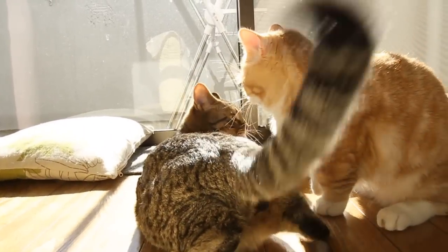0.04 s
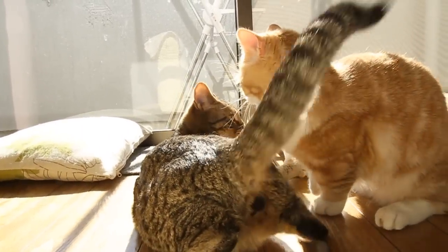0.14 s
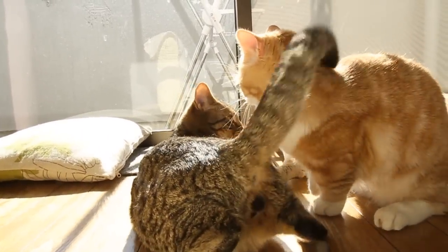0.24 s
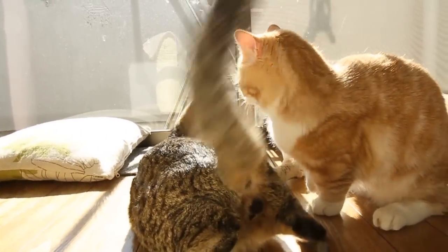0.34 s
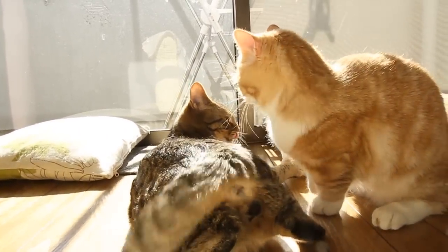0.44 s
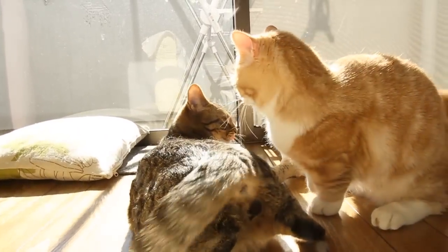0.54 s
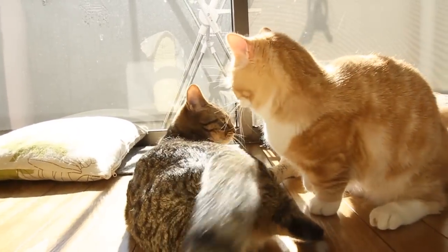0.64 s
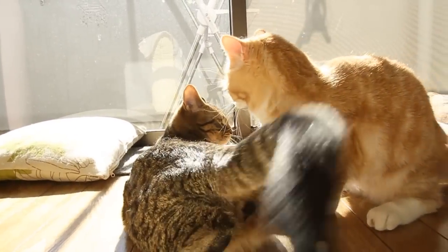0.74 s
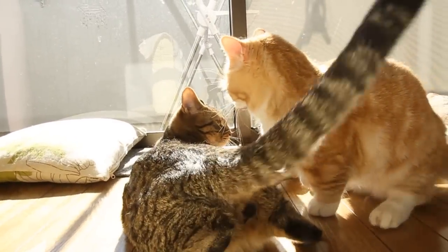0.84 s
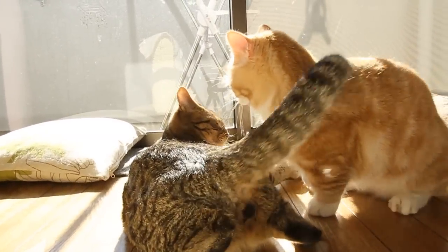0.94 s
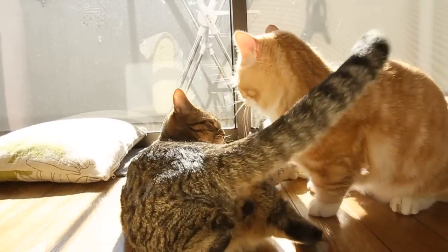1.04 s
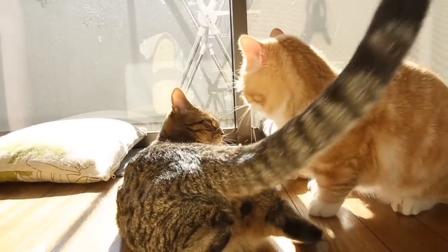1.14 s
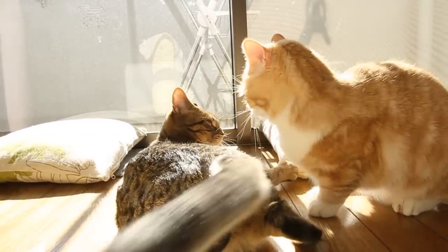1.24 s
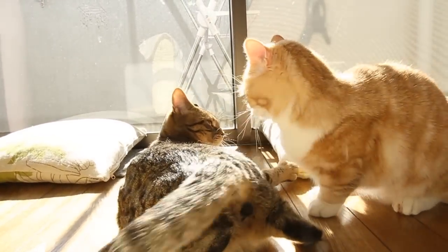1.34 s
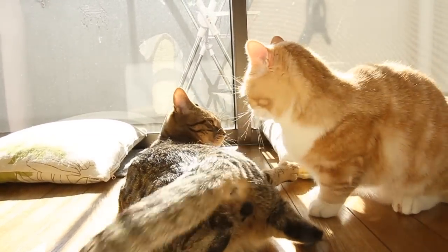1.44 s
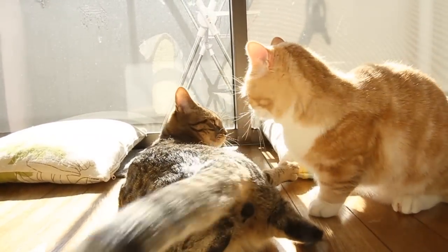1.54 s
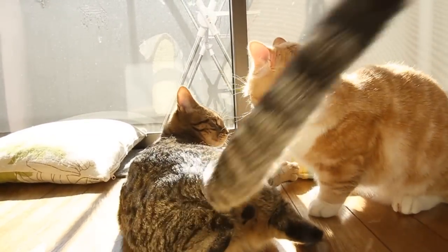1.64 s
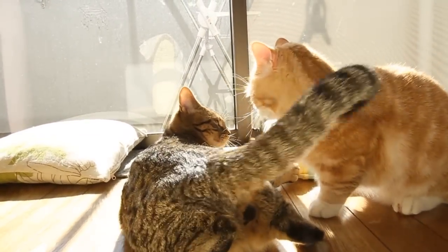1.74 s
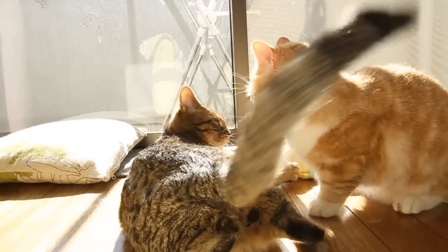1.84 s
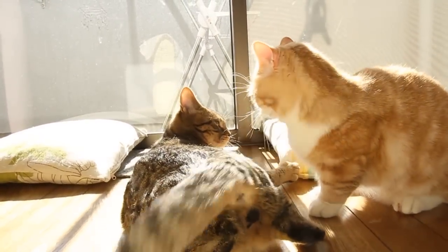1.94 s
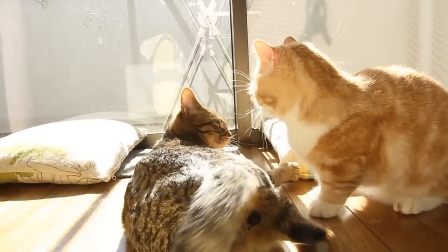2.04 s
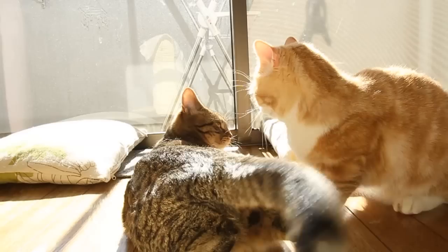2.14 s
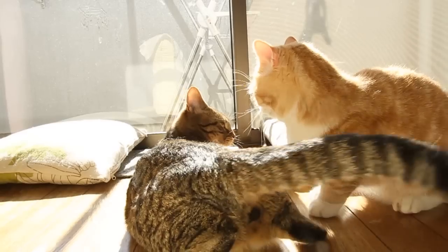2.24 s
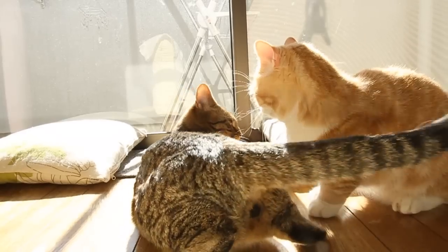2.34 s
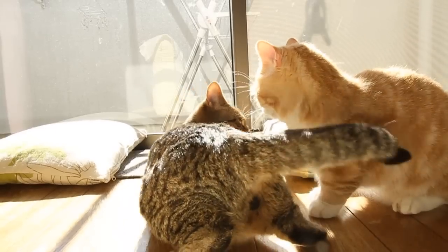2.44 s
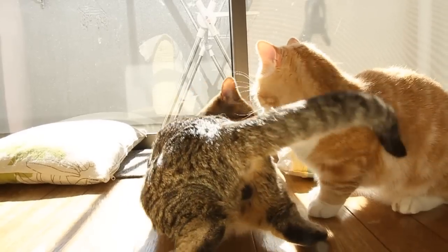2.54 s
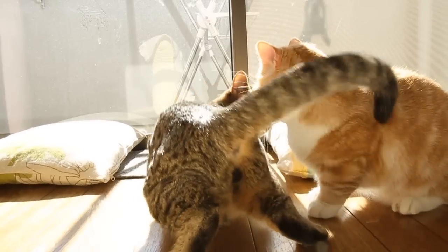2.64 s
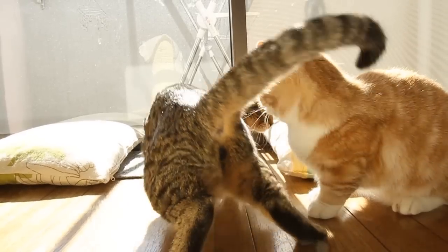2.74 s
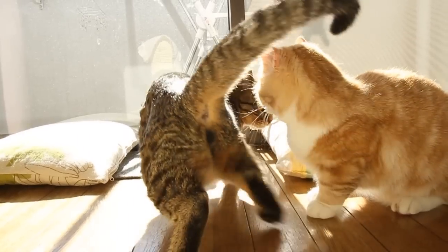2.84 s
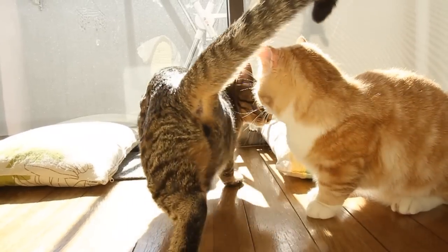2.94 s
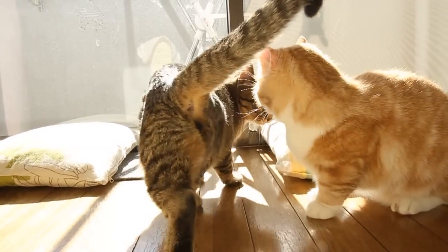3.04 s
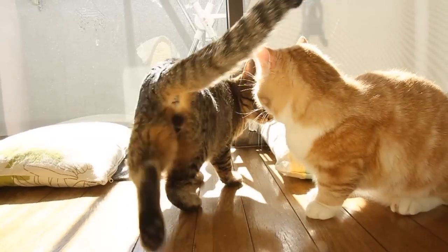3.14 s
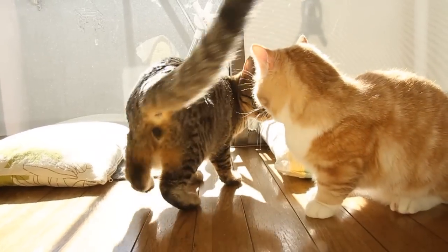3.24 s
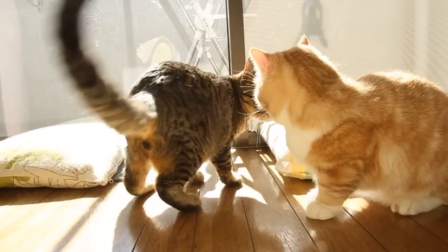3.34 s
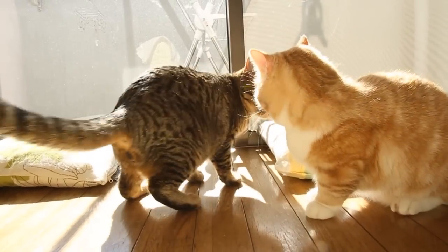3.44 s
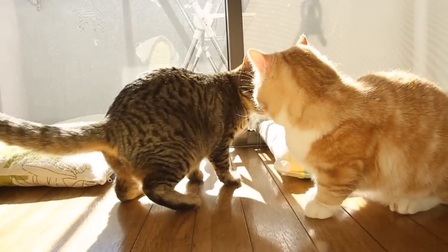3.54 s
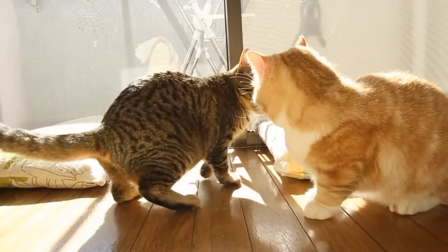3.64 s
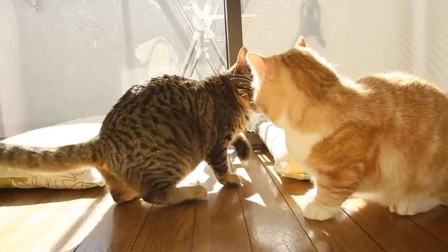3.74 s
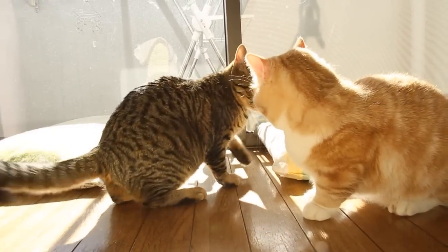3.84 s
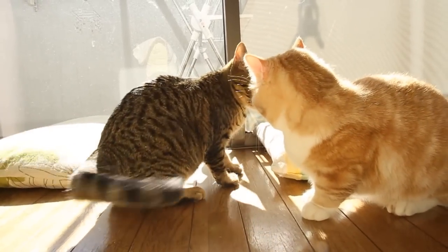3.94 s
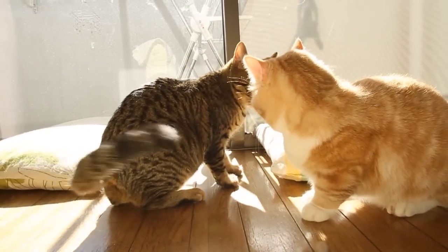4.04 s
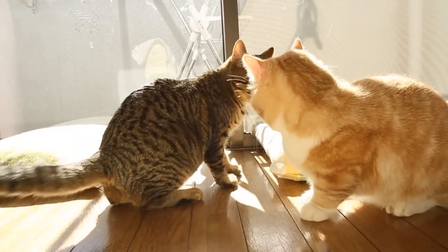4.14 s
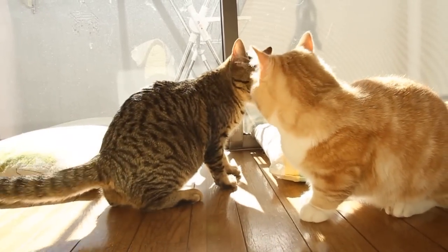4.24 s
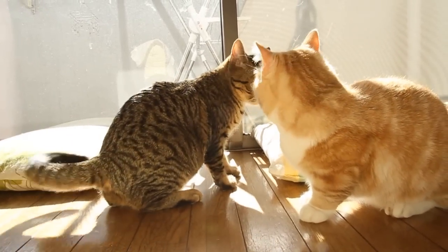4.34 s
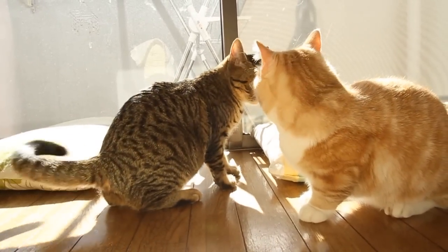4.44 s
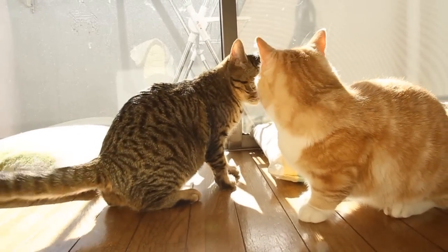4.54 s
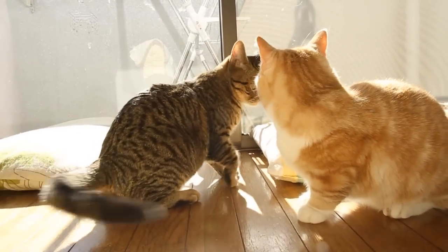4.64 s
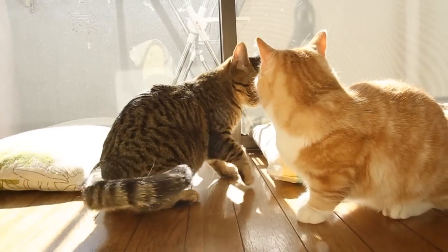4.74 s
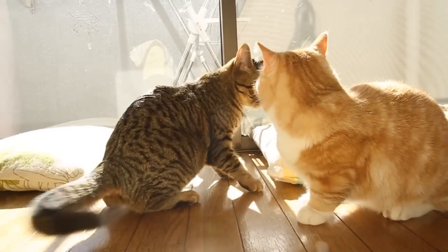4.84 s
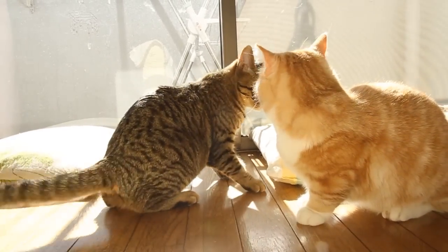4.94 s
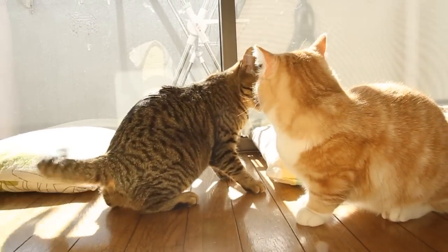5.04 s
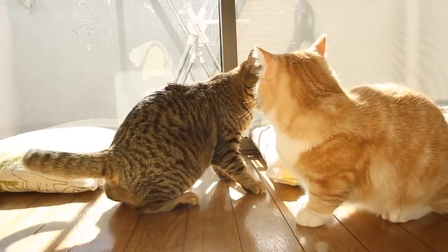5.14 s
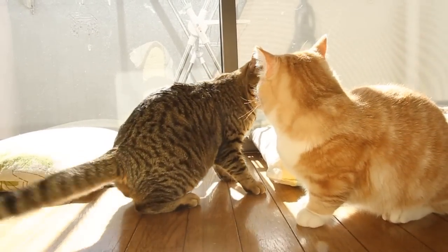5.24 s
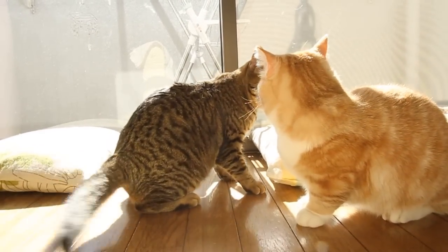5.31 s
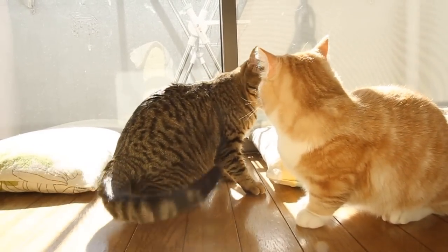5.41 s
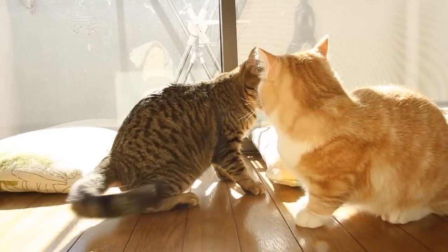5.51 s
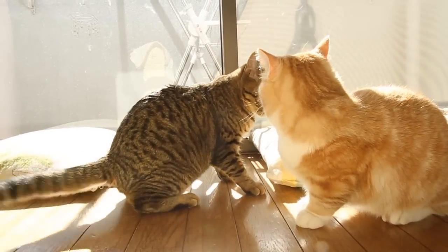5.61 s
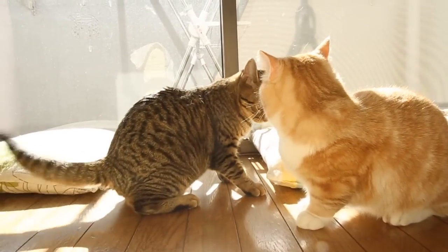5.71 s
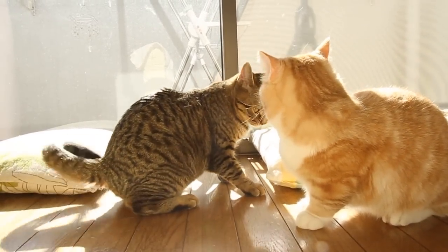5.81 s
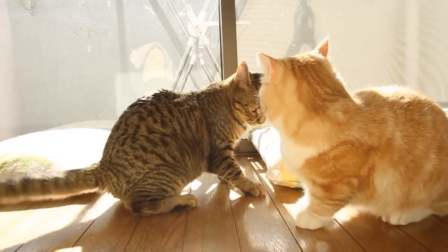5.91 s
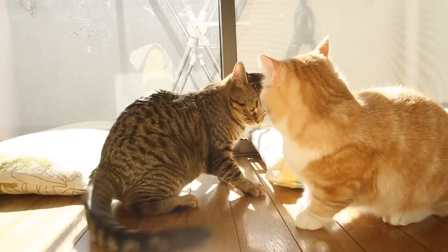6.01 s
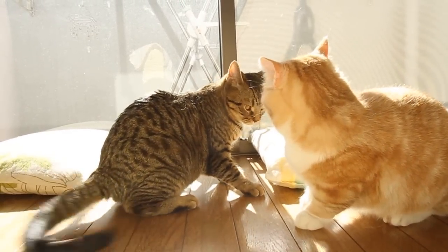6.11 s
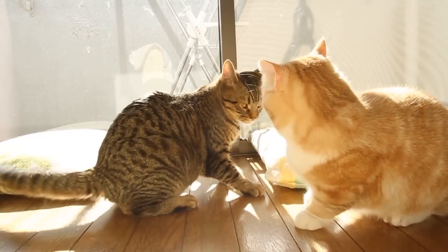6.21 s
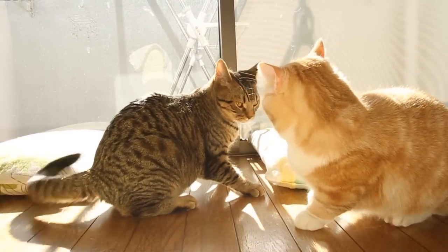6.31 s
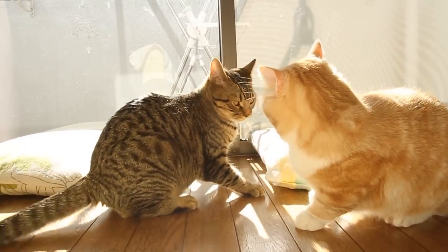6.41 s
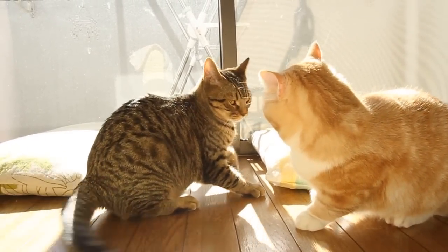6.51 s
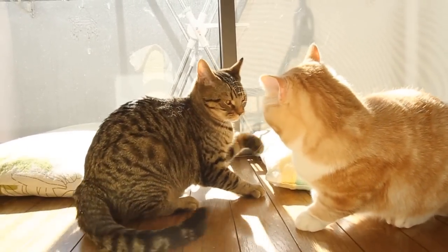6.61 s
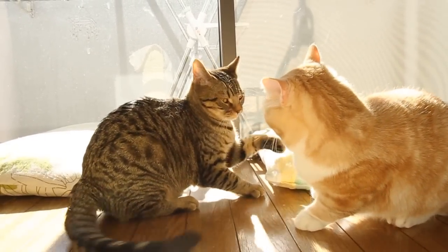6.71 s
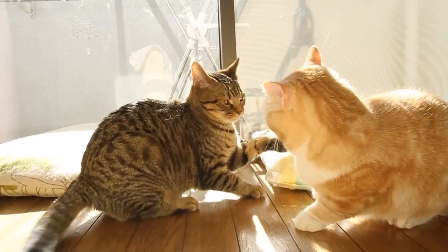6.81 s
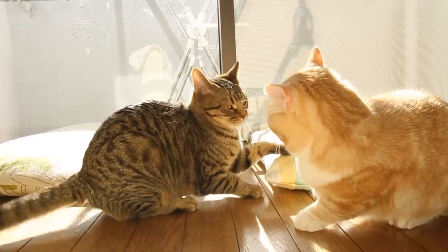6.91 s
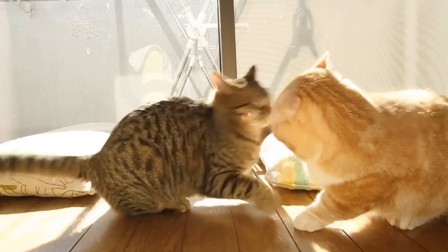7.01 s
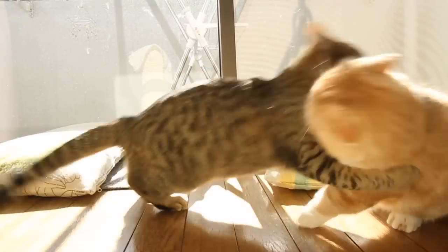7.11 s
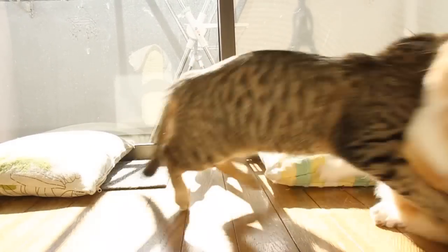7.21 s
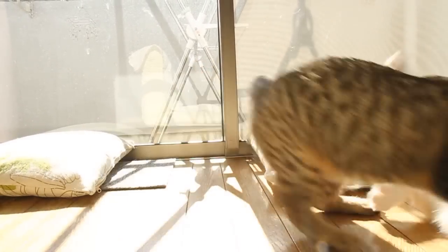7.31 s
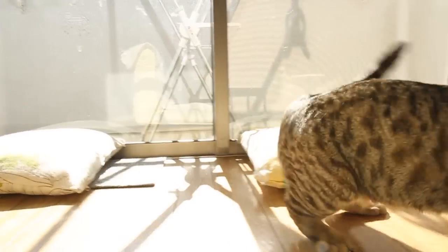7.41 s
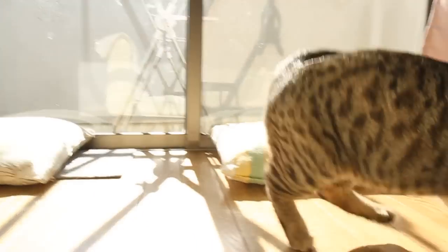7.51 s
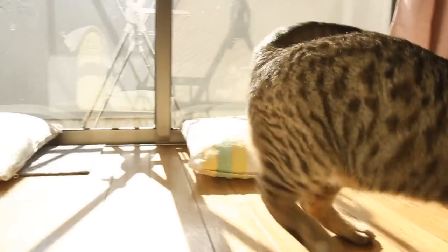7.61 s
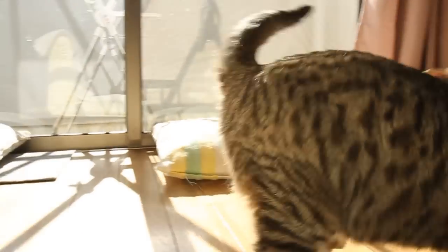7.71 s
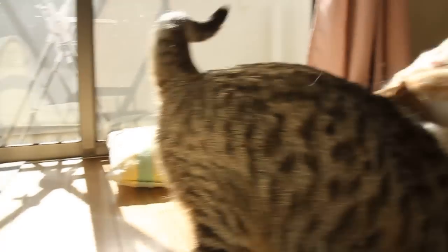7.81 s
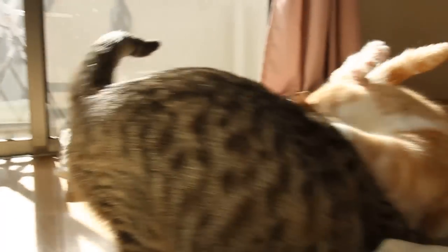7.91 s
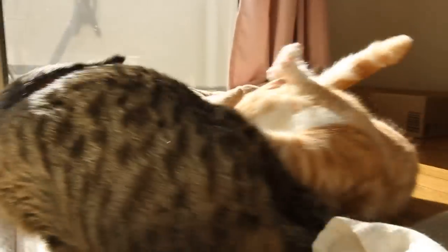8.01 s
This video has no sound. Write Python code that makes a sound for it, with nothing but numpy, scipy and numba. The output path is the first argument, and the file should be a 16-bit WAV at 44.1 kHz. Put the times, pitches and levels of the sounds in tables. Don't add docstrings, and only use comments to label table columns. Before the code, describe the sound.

Close indoor sound of two cats on floorboards: low hum and soft hiss, a firm tail knock, a few softer thumps, delicate claw clicks and a faint hard tinkle. Near the end a pounce breaks the calm with bright, gritty claw scrabbling, clustered woody thuds and two hoarse cat cries. The scuffle ends on a heavy thud, with short diffuse room echoes and background noise swelling as the microphone moves.

```python
import sys
import numpy as np
from scipy import signal
from scipy.fft import rfft, irfft
from scipy.io import wavfile
from scipy.ndimage import uniform_filter1d
from numba import njit

SR = 44100
rng = np.random.default_rng(int(sys.argv[2]) if len(sys.argv) > 2 else 0)


def pcm_store(signal):
    levels = np.round(np.clip(np.atleast_2d(signal), -1, 1) * 32767)
    wavfile.write(sys.argv[1], SR, levels.astype(np.int16).T)


def voltage_ratio(decibels):
    exponent = np.asarray(decibels, float) / 20
    return 10 ** exponent


N = 355446

MAINS_HZ = 59.925
# (multiple of mains [1], level [dB rms])
HUM_LINES = [(1, -68), (2, -53), (3, -62), (4, -62), (5, -63), (6, -72.5), (7, -56), (8, -60.5),
             (10, -69.5), (11, -68.5), (12, -64.5), (13, -60.5), (17, -70.5), (21, -79), (23, -75.5)]
# (frequency [Hz], density [dB per Hz])
HISS_SPECTRUM = [(25, -102), (60, -89), (120, -75), (200, -77.5), (400, -84.5), (700, -86.5), (1200, -87),
                 (2000, -92), (3000, -99), (5000, -101), (9000, -105), (11700, -104), (13000, -106),
                 (15000, -108), (16000, -112)]
RUMBLE_DB, SWELL_S = -68.5, 0.14
# (time [s], level [dB])
RUMBLE_SWELLS = [(.82, -56), (1.34, -55), (1.87, -50), (2.5, -52), (3.7, -58), (3.83, -48), (4.0, -57),
                 (6.47, -52), (6.701, -60), (7.14, -44), (7.32, -58), (7.76, -61), (8.0, -61)]
# (time [s], level [dB])
MIC_SWING = [
    (0, 0.5),
    (7.3, 1),
    (7.6, 5.5),
    (7.8, 4.5),
    (7.95, 4),
    (8.06, 4.5),
]

# (frequency [Hz], level [dB], t60 [s])
BOARD_MODES = [(118, -55, 0.36), (205, -3, 0.084), (270, -7.5, 0.18), (375, -2, 0.033), (432, -2.5, 0.032),
               (534, -59, 0.14)]
# (frequency [Hz], density [dB per Hz])
KNOCK_SPECTRUM = [(250, -43), (500, -3.5), (900, -3.5), (1500, 0), (2500, -7), (4000, -26), (16000, -52)]
# (time [s], peak level [dB], crack of the tip [dB])
TAIL_WHIPS = [
    (0.358, -12, -25),
    (1.885, -15, -27),
]
# (delay [ms], level [dB], board [Hz], contact [ms], t60 [s])
WHIP_PARTS = [
    (0, 1, 370, 0.97, 0.044),
    (2.9, -0.5, 166.6, 1.4, 0.066),
]
TIP_LAG_S, TIP_HZ, TIP_MS, TIP_T60_S = .0015, 1500, .28, .03
# (time [s], peak level [dB], board [Hz], contact [ms])
PAD_FALLS = [(.332, -25, 167, 1.1), (.583, -26.5, 159, 2.93), (0.5896, -25, 199, 1.21),
             (1.457, -36, 161, 4.2), (1.8508, -19, 169, 1.3), (2.043, -31, 172, 4.4),
             (2.0602, -30.5, 175, 1.4), (2.932, -35, 137, 1.8), (3.628, -39.5, 70.6, 6),
             (3.842, -30.5, 127, 1.7), (4.55, -36.5, 64, 7.1), (5.234, -18.5, 109.7, 5.3),
             (6.306, -22, 121, 2.75), (6.332, -27.5, 305, 1.13), (6.385, -33.5, 153, 2.3)]
# (time [s], peak level [dB], board [Hz], contact [ms], t60 [s])
BODY_FALLS = [(6.882, -31.5, 105.5, 4.4, 0.42), (7.057, -25, 109, 2.9, 0.061), (7.184, -28, 143, 2.8, 0.15),
              (7.209, -28, 269, 3.7, 0.18), (7.237, -13.5, 114.7, 3, 0.14), (7.253, -23, 270, 2.1, 0.069),
              (7.261, -8, 205, 1.56, 0.092), (7.327, -21, 222, 3.2, 0.055), (7.497, -21, 126, 2.9, 0.068),
              (7.515, -22, 118, 6, 0.07), (7.61, -14.5, 131, 3.3, 0.11), (7.69, -24.5, 282, 0.88, .08),
              (7.758, -11, 157, 2.53, 0.026), (7.766, -23, 271, 3.1, 0.14), (8.007, -5.5, 130, 3.53, 0.062),
              (8.026, -16, 205, 5.3, .17)]
# (time [s], peak level [dB], board [Hz], contact [ms])
PAW_LANDINGS = [
    (6.311, -24.5, 185, 0.83),
    (6.913, -28.5, 370, 0.54),
    (6.925, -18.5, 512, .17),
    (6.933, -23, 1460, .32),
    (6.951, -23, 181, 1),
    (6.996, -15, 368, 0.53),
    (7.012, -16.5, 442, 0.46),
    (7.039, -25, 384, 0.83),
    (7.149, -33, 120, 1),
]
WHIP_SECOND_HZ, CLAW_BOARD_HZ = 520, 960
PAD_SECOND_BOARD, FALL_SECOND_BOARD = 1.7, 1.8
PAD_CYCLES, CYCLES_PER_MS = 4.9, 2.1
POUNCE_T60_S = 0.054

# (time [s], peak level [dB], t60 [s])
FUR_BRUSHES = [(0.334, -35, 0.038), (0.36, -49, 0.17), (0.5867, -35.5, 0.076), (1.196, -44, 0.11),
               (1.46, -46, .089), (1.852, -35, 0.044), (1.886, -44, 0.089), (2.05, -44.5, 0.12),
               (3.644, -36, .018), (4.47, -39, .013), (6.31, -38, 0.081), (7.5162, -16.5, 0.036),
               (7.693, -31.5, 0.19)]
BRUSH_HZ, BRUSH_SHARE = 9500, 3
# (time [s], peak level [dB], centre [Hz])
CLAW_TAPS = [(.612, -48, 12000), (2.249, -43.5, 6200), (2.545, -46, 14200), (2.723, -41, 4100),
             (2.7525, -34, 4440), (2.759, -34, 4230), (2.918, -44, 2700), (3.0604, -30, 4700),
             (3.073, -35, 8000), (4.56, -47, 3400), (5.14, -46, 3700), (6.384, -41.5, 3080),
             (7.782, -40, 5000), (8.035, -43, 5460)]
TAP_SHARE, TAP_T60_S = 0.5, 0.032
# (time [s], peak level [dB], centre [Hz])
HARD_TINKLES = [
    (3.607, -55, 3550),
    (3.865, -46, 3000),
    (3.9, -57, 3070),
    (4.005, -51, 3070),
    (4.351, -49.5, 7160),
]
TINKLE_SHARE, TINKLE_T60_S = .1, 0.11
# (time [s], peak level [dB], centre [Hz], width as share of centre [1])
CLAW_SCRABBLES = [(6.885, -48, 4030, .34), (6.912, -23, 3430, 0.45), (6.9265, -8.5, 3630, 0.27),
                  (6.926, -29, 13000, .5), (6.937, -19, 6000, 0.81), (6.9971, -6.5, 5000, 0.58),
                  (7.001, -10, 3380, 0.29), (7.007, -20, 14000, .37), (7.0116, -1.5, 3580, 0.44),
                  (7.021, -12, 6500, 0.53), (7.1402, -21, 3520, 0.41), (7.1565, -29, 5070, 0.18),
                  (7.184, -25, 5000, 1.3), (7.199, -17.5, 4570, 0.21), (7.206, -15, 4230, 0.14),
                  (7.2178, -25, 12000, .5), (7.27, -10.5, 3430, 0.66), (7.281, -27, 12500, .6),
                  (7.5273, -23, 12000, .8)]
CLAW_T60_S = 0.029

# (frequency [Hz], density [dB per Hz])
FUR_SPECTRUM = [(150, -30), (300, 1.5), (900, -1), (1500, 0), (2500, 2.5), (4500, -3), (6500, -2),
                (7600, -13.5), (9500, -12.5), (12000, -10), (15000, -19)]
# (peak time [s], level [dB], rise [ms], fall [ms], brightness [dB])
STROKES = [(.85, -64, 250, 300, 11), (1.006, -46.5, 15, 53, -12), (1.2, -60, 100, 92, -5),
           (3.9, -53, 160, 70, -15), (5.14, -55, 10, 25, -3), (5.92, -74, 50, 300, 11),
           (6.33, -64, 150, 300, 0), (6.885, -42, 7.7, 69, -4), (6.94, -37, 28, 16, 7),
           (7.022, -45, 17, 86, 8), (7.15, -34.5, 7.2, 60, -1), (7.195, -31.5, 46, 30, 3.5),
           (7.29, -44, 56, 60, 1), (7.44, -39, 40, 150, -12), (7.562, -30.5, 30, 70, -9),
           (7.71, -53, 66, 31, -12), (7.95, -59, 400, 800, 2)]

# (time [s], pitch [Hz], level [dB], throat [Hz], mouth [Hz])
SQUALLS = [
    [(7.34, 328.8, -40, 1670, 1990), (7.351, 341.5, -20, 1660, 2040), (7.369, 370, -14, 1470, 2500),
     (7.39, 366.6, -11.5, 1430, 2610), (7.405, 373, -19.5, 1540, 2920), (7.42, 382, -28, 1400, 2400),
     (7.44, 376, -48, 1470, 2600)],
    [(7.49, 440, -31, 1830, 2300), (7.513, 386, -18.5, 1560, 2250), (7.539, 392, -19, 1560, 2300),
     (7.551, 432, -18, 1740, 2600), (7.575, 404, -21, 1630, 2750), (7.603, 372, -26, 1470, 2600),
     (7.64, 378, -35, 1920, 2500), (7.69, 378, -36, 1450, 2250), (7.715, 360, -40, 1050, 2070)],
]
CHEST_PUSH = [-7.5, -22]
THROAT_RING = [-.5, -2.5]
# (frequency [Hz], width [Hz], level [dB])
HEAD_RESONANCES = [(785, 160, -16), (1150, 200, -11), (3700, 600, -22), (6500, 1100, -21),
                   (11800, 1500, -30)]
# (frequency [Hz], width [Hz], level [dB])
RASP_BANDS = [(824, 1570, -12.5), (5000, 2000, -22.5), (8000, 1300, -23.5)]
ROUGH_START, ROUGH_END, PAIRS = .22, .95, .32

# (frequency [Hz], t60 [s])
ROOM_DECAY = [(80, 0.36), (300, 0.33), (1000, 0.22), (4000, 0.28), (12000, 0.25)]


def rms_one(x):
    return x / np.sqrt(np.mean(x ** 2) + 1e-20)


def in_time(rows, column):
    table = np.array(rows)
    return np.interp(np.arange(N) / SR, table[:, 0], table[:, column])


def gate(rows, fade_s=0.021):
    t = np.arange(N) / SR
    inside = np.minimum(t - rows[0][0], rows[-1][0] - t)
    return np.clip(inside / fade_s + 1, 0, 1)


def at_hz(points, hz):
    table = np.array(points)
    return np.interp(np.log(hz + 1), np.log(table[:, 0]), table[:, 1])


def coloured(x, spectrum):
    hz = np.arange(len(x) // 2 + 1) * SR / len(x)
    return irfft(rfft(x) * voltage_ratio(at_hz(spectrum, hz)), len(x))


def filtered(x, order, hz, kind):
    return signal.sosfilt(signal.butter(order, hz, kind, fs=SR, output="sos"), x)


def resonance(x, hz, width_hz):
    r = np.exp(-np.pi * width_hz / SR)
    zeros = (1 - r * r) / 2 * np.array([1, 0, -1])
    poles = [1, -2 * r * np.cos(2 * np.pi * hz / SR), r * r]
    return signal.lfilter(zeros, poles, x)


@njit
def gliding(x, hz, r, sr):
    y = np.zeros(len(x))
    for i in range(2, len(x)):
        drive = (1 - r * r) / 2 * (x[i] - x[i - 2])
        y[i] = drive + 2 * r * np.cos(2 * np.pi * hz[i] / sr) * y[i - 1] - r * r * y[i - 2]
    return y


def add(out, s, piece):
    at = round(s * SR)
    out[at:at + len(piece)] += piece[:N - at]


def room_tone():
    t = np.arange(N) / SR
    hum = sum(voltage_ratio(db) * np.sqrt(2) * np.sin(2 * np.pi * (k * MAINS_HZ * t + rng.random()))
              for k, db in HUM_LINES)
    hiss = coloured(rng.standard_normal(N), HISS_SPECTRUM) * np.sqrt(SR / 2)
    rumble = rms_one(filtered(rng.standard_normal(N), 2, [28, 85], "band"))
    coarse = t[::64]
    swells = sum(voltage_ratio(db - 7.0) * np.exp(-((coarse - s) / SWELL_S) ** 2) for s, db in RUMBLE_SWELLS)
    return hum + hiss + (voltage_ratio(RUMBLE_DB + 2.5) + np.interp(t, coarse, swells)) * rumble


def contacts():
    rows = [(s + ms / 1000, db + part_db, hz, WHIP_SECOND_HZ, contact_ms, t60)
            for s, db, _ in TAIL_WHIPS for ms, part_db, hz, contact_ms, t60 in WHIP_PARTS]
    rows += [(s + TIP_LAG_S, db, TIP_HZ, WHIP_SECOND_HZ, TIP_MS, TIP_T60_S) for s, _, db in TAIL_WHIPS]
    rows += [(s, db, hz, PAD_SECOND_BOARD * hz, ms, (PAD_CYCLES + CYCLES_PER_MS * ms) / hz)
             for s, db, hz, ms in PAD_FALLS]
    rows += [(s, db, hz, FALL_SECOND_BOARD * hz, ms, t60) for s, db, hz, ms, t60 in BODY_FALLS]
    rows += [(s, db, hz, CLAW_BOARD_HZ, ms, POUNCE_T60_S) for s, db, hz, ms in PAW_LANDINGS]
    return rows


def thumps():
    out, t = np.zeros(N), np.arange(SR // 4) / SR
    blows = contacts()
    spread = rng.standard_normal((len(blows), len(BOARD_MODES), 2))
    dense = rng.standard_normal((len(blows), len(t)))
    for (s, db, hz, second_hz, contact_ms, t60), luck, noise in zip(blows, spread, dense):
        two_boards = np.sin(2 * np.pi * hz * t) + voltage_ratio(-10.0) * np.sin(2 * np.pi * second_hz * t)
        body = two_boards * voltage_ratio(-60 * t / t60)
        for k, ((mode_hz, mode_db, mode_t60), (a, b)) in enumerate(zip(BOARD_MODES, luck)):
            wave = np.sin(2 * np.pi * mode_hz * (1 + 0.075 * b) * t) * (-1) ** k
            decay_db = 60 * t / min(mode_t60, 1.5 * t60)
            body += voltage_ratio(mode_db - 4 + 2.5 * a - decay_db) * wave
        knock = rms_one(coloured(noise, KNOCK_SPECTRUM))
        body += voltage_ratio(-0.5 - 4.1 * contact_ms - 60 * t / (1.43 * t60)) * knock
        cut_hz = 900 / np.clip(contact_ms, .2, 12)
        body = filtered(body, 4, cut_hz, "low")
        click = np.exp(-t / .0002) * voltage_ratio(-3 - 9 * contact_ms)
        polarity = 1 if contact_ms < 1.2 else -1
        lowest_hz = .62 * min(hz, second_hz, 170)
        blow = filtered(body / np.abs(body).max() + click, 3, lowest_hz, "high")
        add(out, s, polarity * voltage_ratio(db) * blow)
    return out


def strikes():
    return ([(s, db, BRUSH_HZ, BRUSH_SHARE, t60) for s, db, t60 in FUR_BRUSHES]
            + [(*row, TAP_SHARE, TAP_T60_S) for row in CLAW_TAPS]
            + [(*row, TINKLE_SHARE, TINKLE_T60_S) for row in HARD_TINKLES]
            + [(*row, CLAW_T60_S) for row in CLAW_SCRABBLES])


def claws():
    out, t = np.zeros(N), np.arange(SR // 8) / SR
    rows = strikes()
    crackles = rng.standard_normal((len(rows), len(t)))
    for (s, db, hz, share, t60), crackle in zip(rows, crackles):
        snap = 1.15 * voltage_ratio(-60 * t / 0.0028)
        contact = crackle * (voltage_ratio(-60 * t / t60) + snap)
        burst = resonance(contact, hz, share * hz) + 0.68 * share * resonance(contact, 2200, 2700)
        add(out, s, voltage_ratio(db + 0.5) * burst / np.abs(burst).max())
    return out


def room(x):
    t = np.arange(SR // 2) / SR
    edges, tail = 60 * 2. ** np.arange(9), 0
    for low, high in zip(edges, edges[1:]):
        band = filtered(rng.standard_normal(len(t)), 2, [low, high], "band")
        band /= np.abs(signal.hilbert(band)) ** .6 + .01
        band *= np.sqrt(high - low) / np.std(band)
        tail = tail + band * voltage_ratio(-60 * t / at_hz(ROOM_DECAY, np.sqrt(low * high)))
    tail *= np.clip((t - .004) / 0.0062, 0, 1)
    return signal.fftconvolve(x, tail / np.sqrt(np.sum(tail ** 2)))[:N]


def sliding():
    clumps = rms_one(uniform_filter1d(rng.standard_normal(N), size=130))
    uneven_db = 1.7 * np.minimum(rng.exponential(1, N), 5) + 2.6 * clumps
    grains = rng.standard_normal(N) * voltage_ratio(uneven_db)
    fur = rms_one(coloured(grains, FUR_SPECTRUM))
    treble = signal.sosfiltfilt(signal.butter(2, 3600, "high", fs=SR, output="sos"), fur)
    out, t = np.zeros(N), np.arange(N) / SR
    for s, db, rise_ms, fall_ms, bright_db in STROKES:
        rise_s, fall_s = rise_ms / 1000, fall_ms / 1000
        near = slice(round((s - 4 * rise_s) * SR), round((s + 4 * fall_s) * SR))
        fall_db = 10 * np.maximum((s - t[near]) / rise_s, (t[near] - s) / fall_s)
        out[near] += voltage_ratio(db - fall_db) * (fur[near] + (voltage_ratio(bright_db) - 1) * treble[near])
    return out


def cries():
    out = np.zeros(N)
    for rows, chest_db, throat_db in zip(SQUALLS, CHEST_PUSH, THROAT_RING):
        span = slice(round(rows[0][0] * SR) - 800, round(rows[-1][0] * SR) + 800)
        since, pitch, db, throat_hz, mouth_hz = (in_time(rows, k)[span] for k in range(5))
        since = since - rows[0][0]
        rough = ROUGH_START + (ROUGH_END - ROUGH_START) * (since / since[-1]) ** 2
        luck = rng.standard_normal((3, len(pitch)))
        wobble = rms_one(uniform_filter1d(luck[0], size=120))
        phase = np.cumsum(pitch * (1 + .095 * rough * wobble)) / SR
        cycle = phase.astype(int)
        pulses = np.diff(cycle, prepend=0) * (1 + PAIRS * (-1.) ** cycle) * voltage_ratio(4 * rough * luck[1])
        air = luck[2] * np.exp(-2.5 * (phase % 1))
        source = signal.lfilter([1], [1, -.6], pulses - pitch / SR + .27 * rough * air)

        throat_r, mouth_r = np.exp(-np.pi * np.array([210, 480]) / SR)
        opening = voltage_ratio(-8 + 7 * (mouth_hz - 2000) / 700)
        throat = voltage_ratio(throat_db) * gliding(source, throat_hz, throat_r, SR)
        mouth = opening * gliding(source, mouth_hz, mouth_r, SR)
        voice = filtered(throat - mouth, 3, [950, 3200], "band")
        voice += sum(voltage_ratio(level_db) * resonance(resonance(source, hz, w), hz, w)
                     for hz, w, level_db in HEAD_RESONANCES)
        fundamental = resonance(resonance(source, 260, 240), 256, 240)
        rasp = sum(voltage_ratio(level_db) * resonance(resonance(air, hz, w), hz, w) for hz, w, level_db in RASP_BANDS)
        voice += voltage_ratio(chest_db) * (fundamental + rasp)
        voice /= np.sqrt(uniform_filter1d(voice ** 2, size=900) + 1e-12)
        out[span] = voice * voltage_ratio(db) * gate(rows, fade_s=0.0037)[span]
    return out


def scene():
    low, high, voice = thumps(), claws() + sliding(), cries()
    thin = filtered(low, 1, 260, "high")
    echoes = room(voltage_ratio(-8) * thin + voltage_ratio(-10.5) * high + voltage_ratio(-6.0) * voice)
    background = voltage_ratio(in_time(MIC_SWING, 1)) * room_tone()
    return (low + high + voice + echoes + background)[None]


def band_limit(x):
    return signal.sosfilt(signal.butter(12, 16640, fs=SR, output="sos"), x)


def record(dry):
    rounded = 1.1 * np.tanh(dry / 1.1)
    finished = filtered(rounded, 12, 15600, "low")
    return band_limit(finished)


dry = scene()
out = record(dry)
pcm_store(out)
```